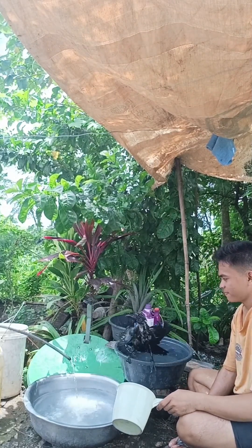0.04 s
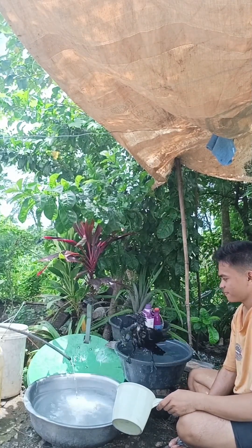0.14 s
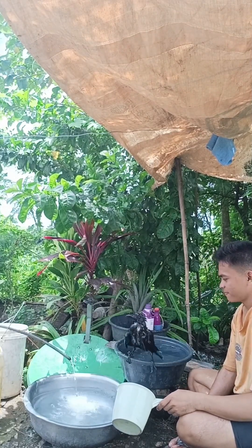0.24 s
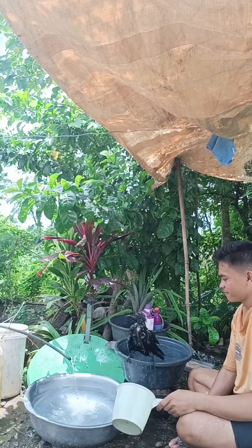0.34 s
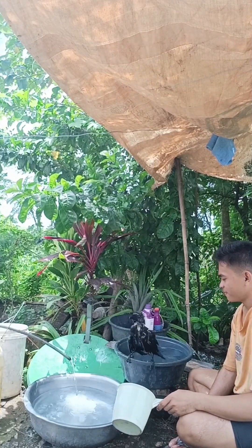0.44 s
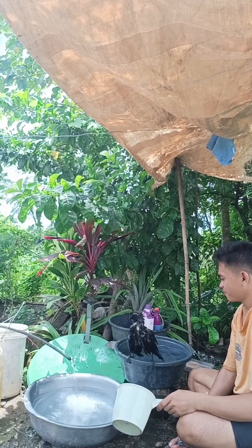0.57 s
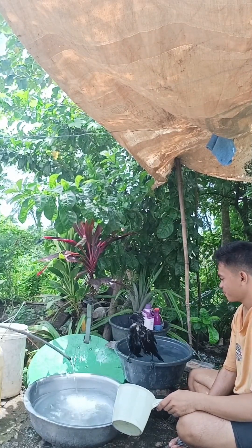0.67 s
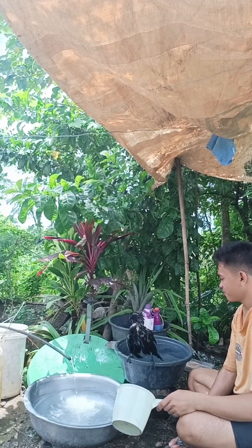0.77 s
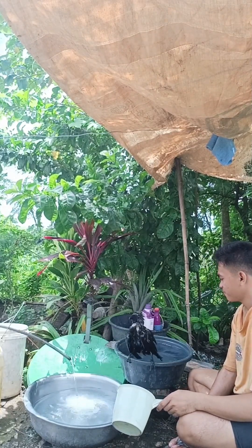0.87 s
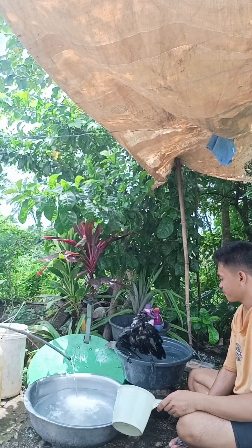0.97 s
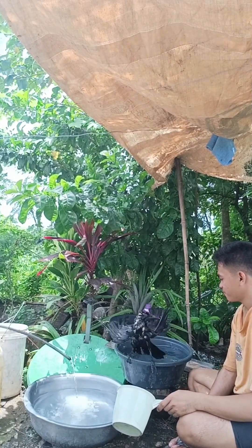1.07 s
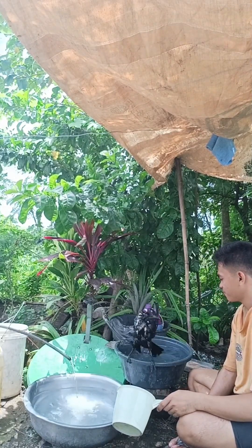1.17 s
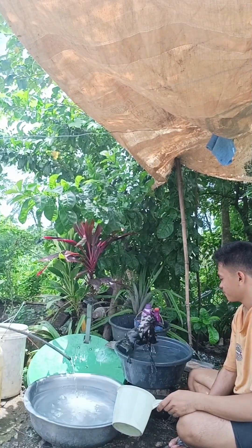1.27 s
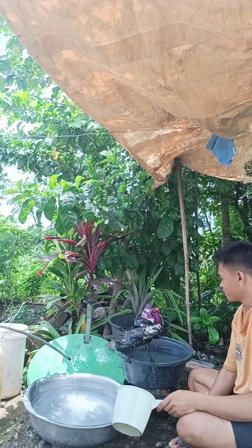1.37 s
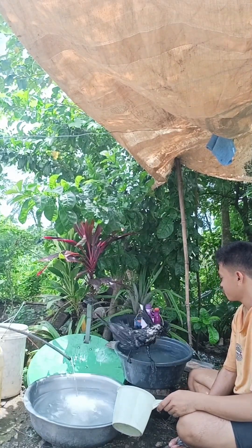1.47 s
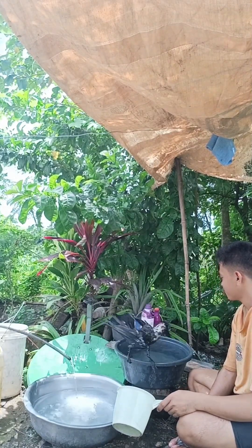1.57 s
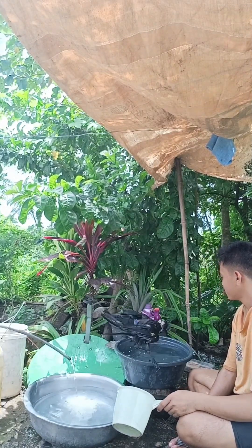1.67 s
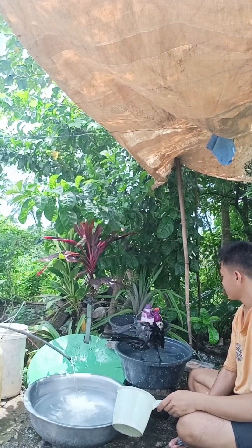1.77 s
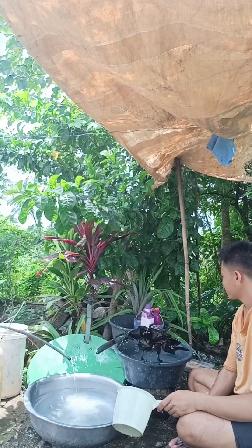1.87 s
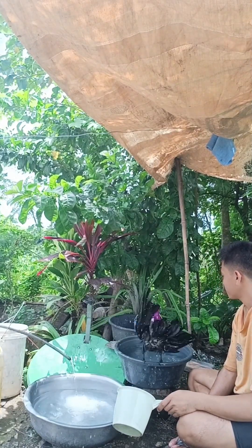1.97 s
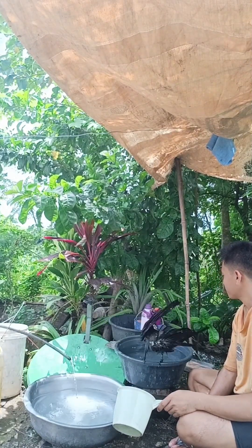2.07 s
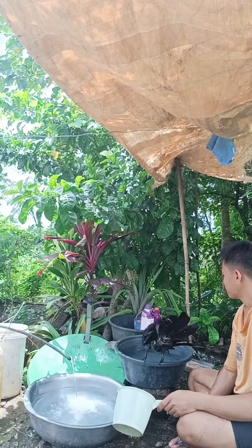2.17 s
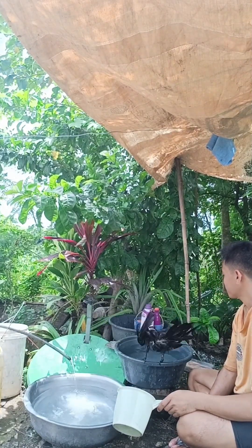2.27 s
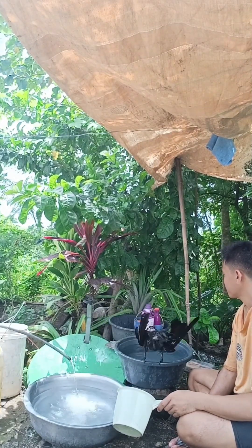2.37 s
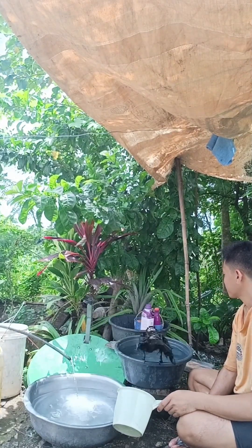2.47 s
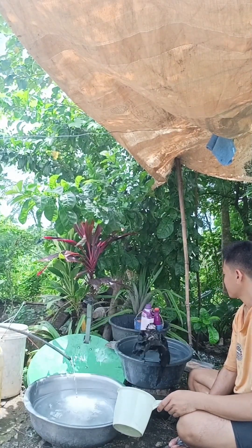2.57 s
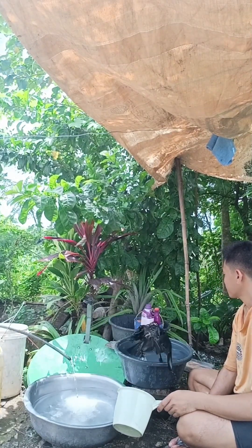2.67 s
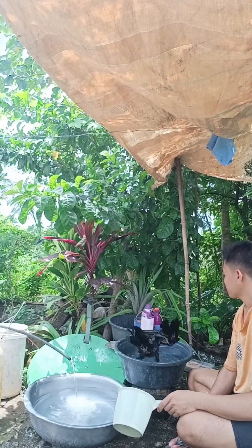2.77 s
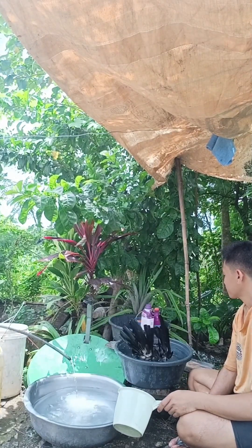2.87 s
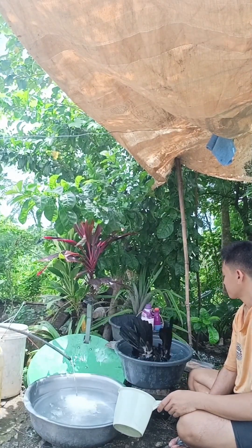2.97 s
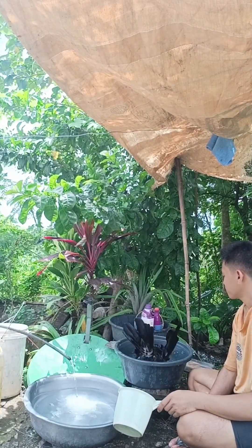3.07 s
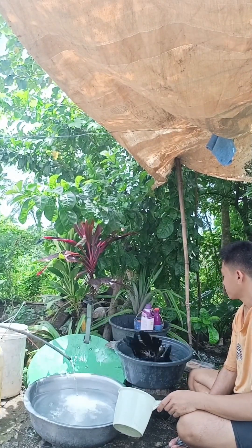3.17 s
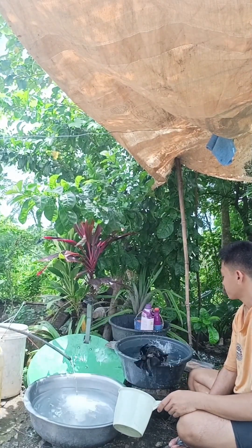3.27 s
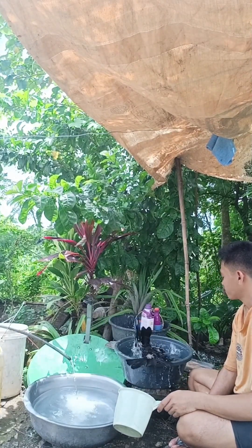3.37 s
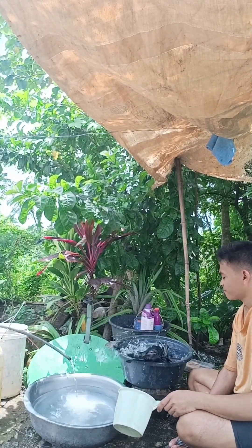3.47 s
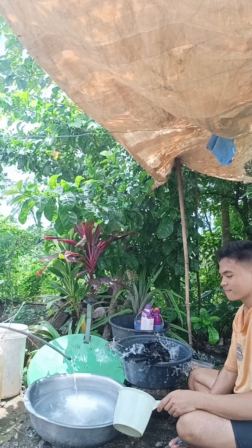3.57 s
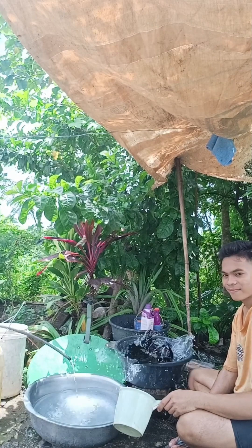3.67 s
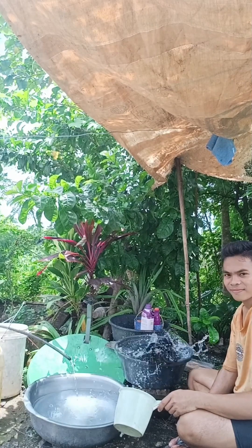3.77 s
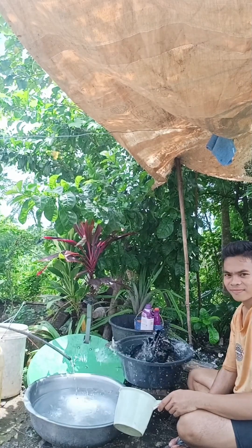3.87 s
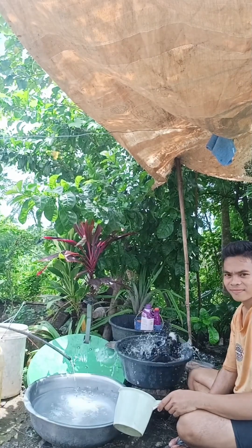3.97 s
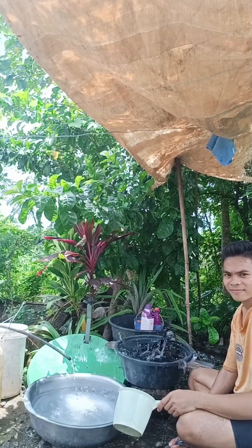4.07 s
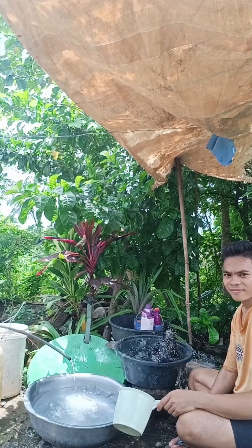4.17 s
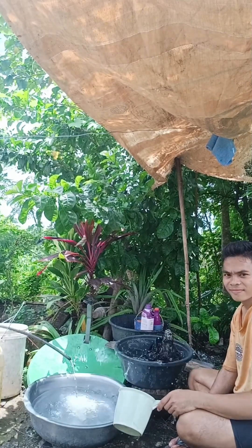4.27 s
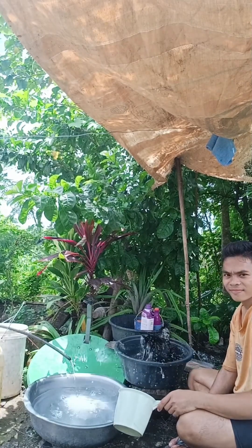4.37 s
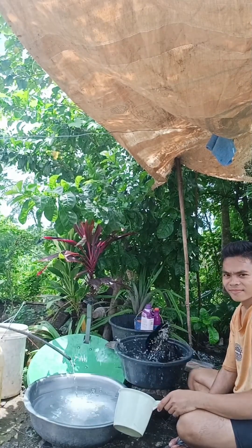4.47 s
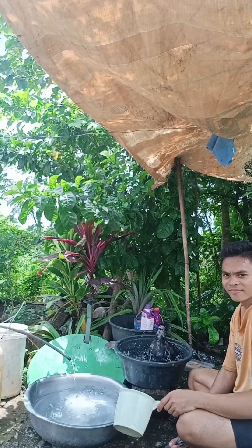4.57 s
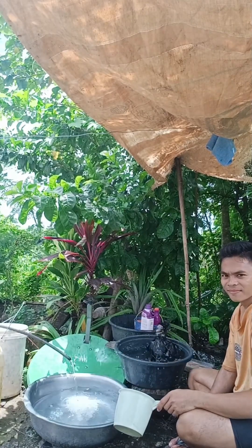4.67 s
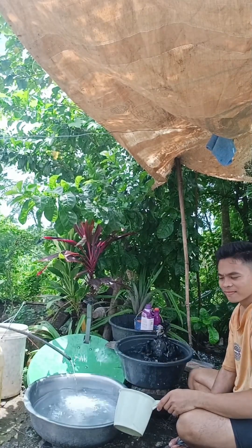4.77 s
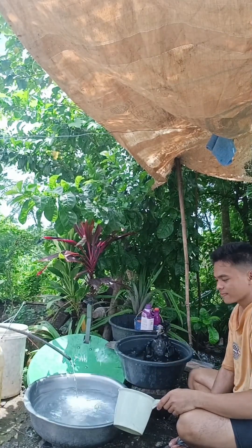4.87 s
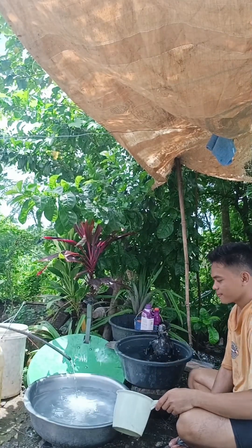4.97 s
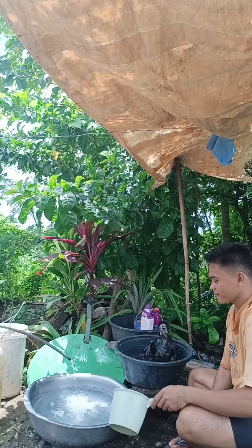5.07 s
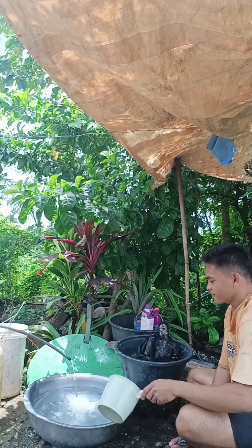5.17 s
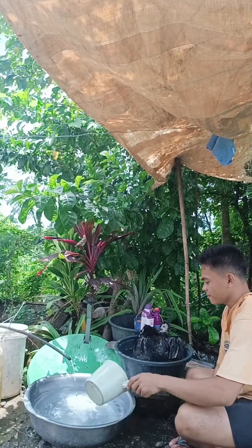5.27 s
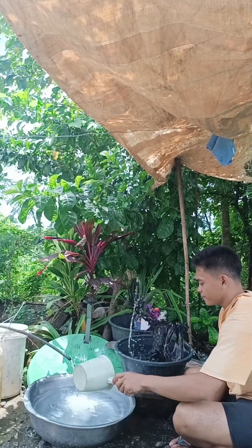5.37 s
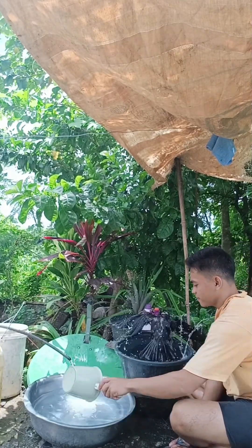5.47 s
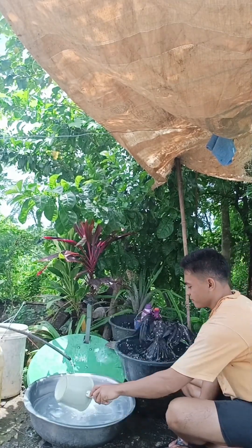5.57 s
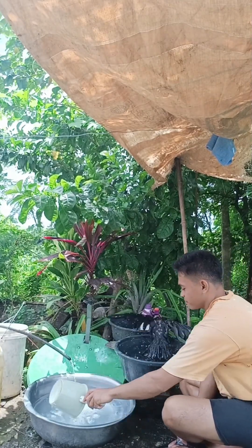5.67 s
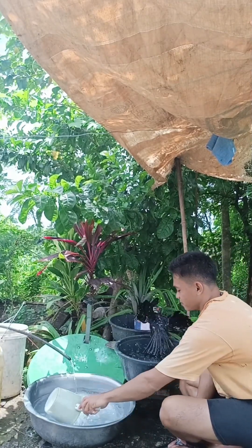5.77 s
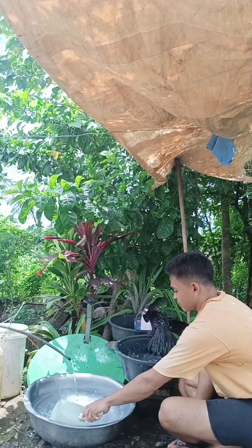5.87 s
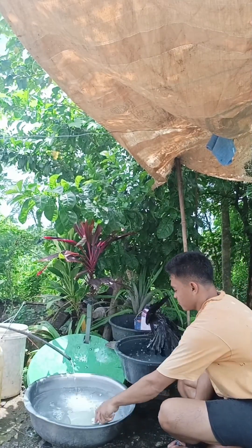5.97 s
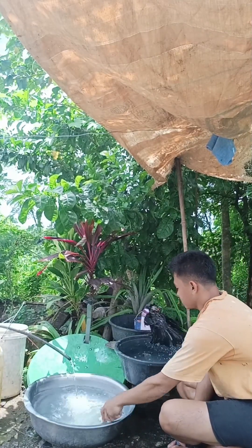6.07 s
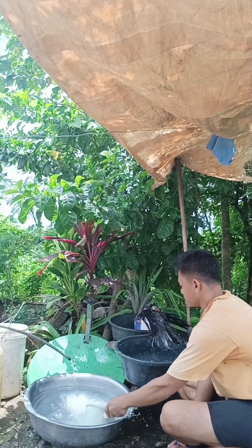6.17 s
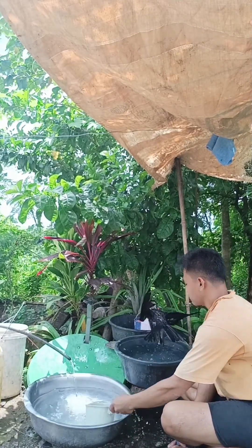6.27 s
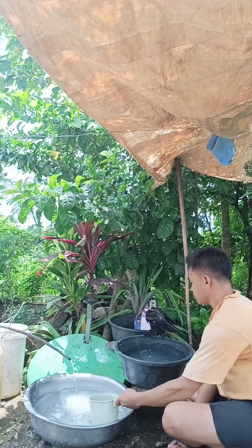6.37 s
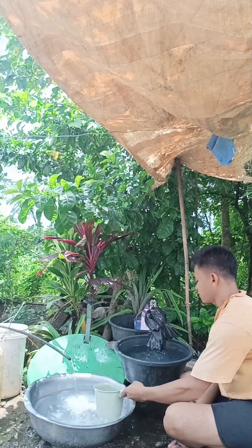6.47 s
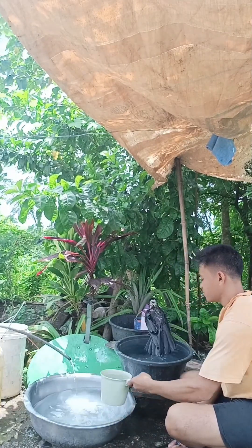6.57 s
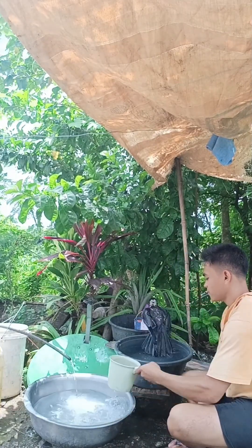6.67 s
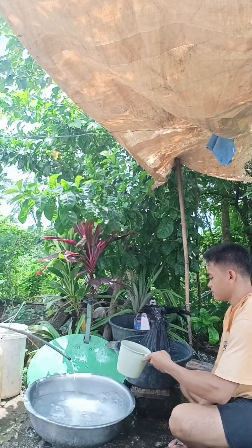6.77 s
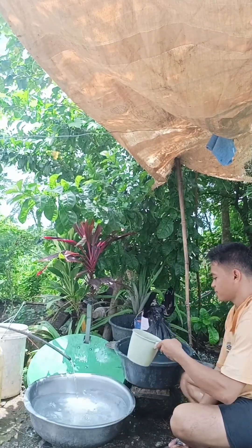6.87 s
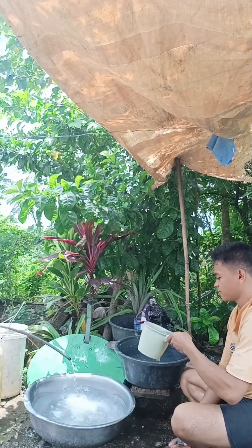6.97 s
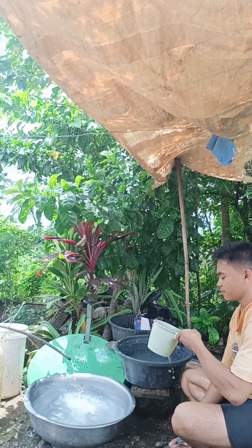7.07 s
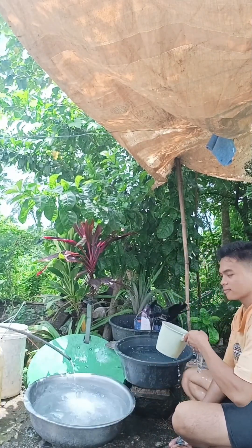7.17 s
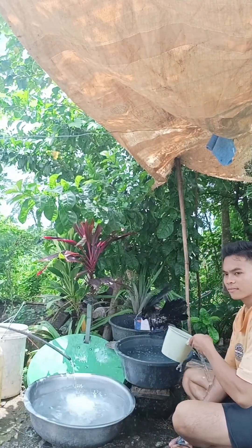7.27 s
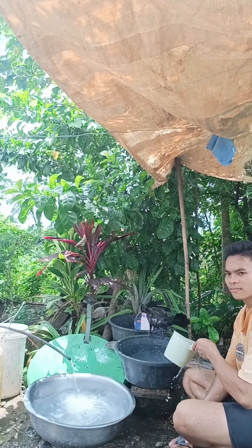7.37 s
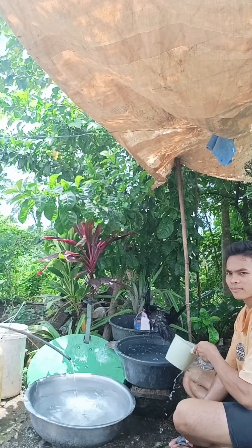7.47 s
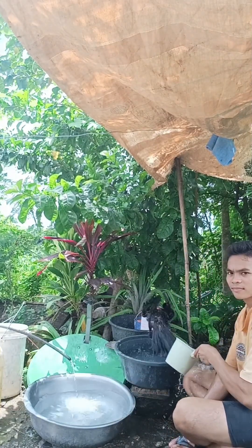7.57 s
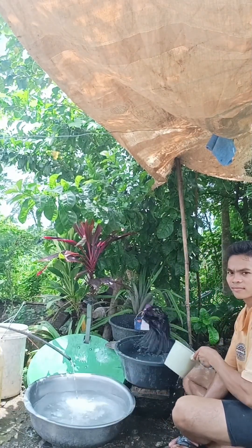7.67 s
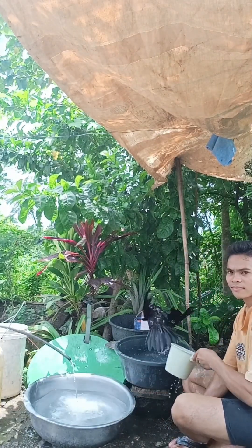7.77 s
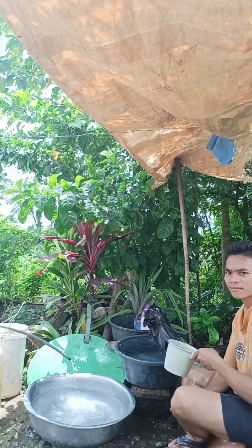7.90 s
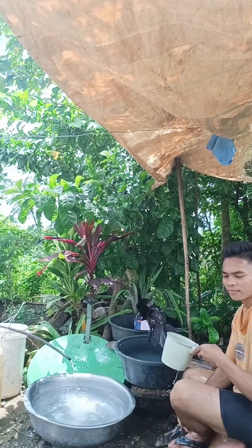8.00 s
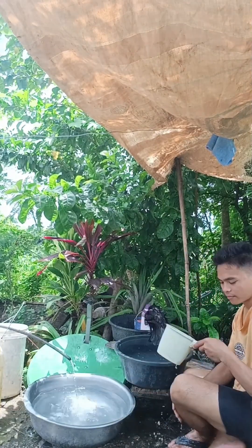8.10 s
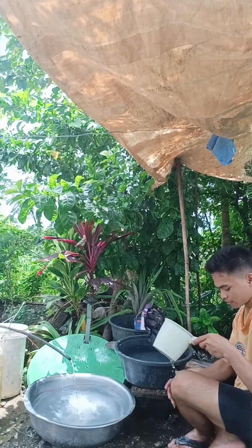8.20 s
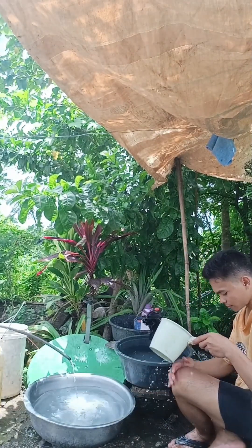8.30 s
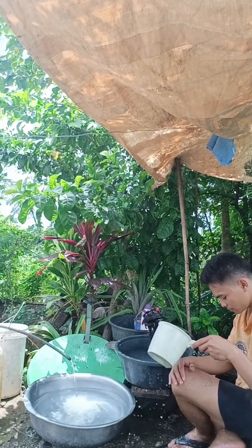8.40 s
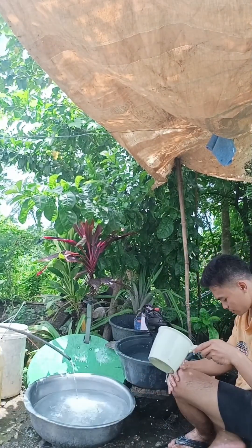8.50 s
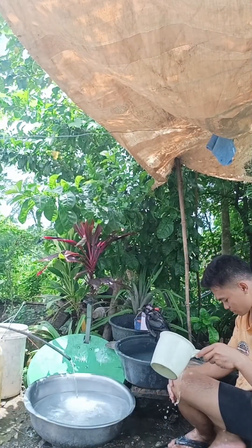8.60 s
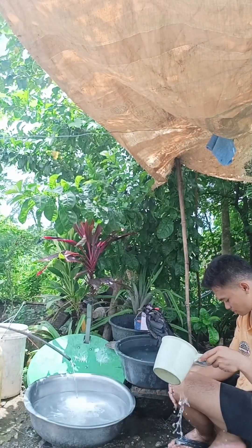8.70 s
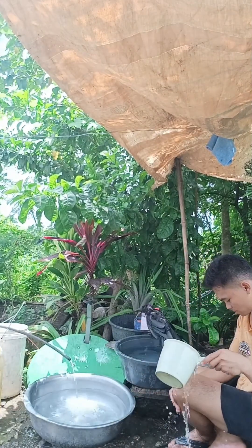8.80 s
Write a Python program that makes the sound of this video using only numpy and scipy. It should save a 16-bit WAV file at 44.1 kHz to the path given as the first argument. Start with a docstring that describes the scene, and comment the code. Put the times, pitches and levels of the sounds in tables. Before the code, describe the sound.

A bird splashes in a water tub in wet bursts over a thin trickle into a metal basin; a plastic dipper knocks, scoops and pours.

```python
"""In an open garden yard a bird bathes in a tub: wing beats, shakes, slaps and heavy drops churn the water
and throw spray in bursts. Wet sounds are air bubbles ringing in water, mixed with shaped noise. A thin
trickle runs all the while into a metal basin; stray drops tick on its rim. A plastic dipper knocks, exciting
the basin's modes, then scoops, slops and is tipped out on the ground. Filtered noise makes the rumble and
soft wash; low pulses make puffs of air. Two close microphone ports hear each spot direct and by echoes."""
import sys
import numpy as np
from scipy import signal
from scipy.fft import rfft, irfft, next_fast_len
from scipy.io import wavfile
from scipy.ndimage import map_coordinates

SR = 44100
rng = np.random.default_rng(int(sys.argv[2]) if len(sys.argv) > 2 else 0)


def pcm_store(signal):
    """Save signal as 16-bit PCM."""
    levels = np.round(np.clip(np.atleast_2d(signal), -1, 1) * 32767)
    wavfile.write(sys.argv[1], SR, levels.astype(np.int16).T)


N = 389830  # length in samples


def amp(db):
    """Logarithmic level: decibels to amplitude gain."""
    return 10 ** (np.asarray(db) / 20)


def unit(x):
    """Effective value: scale to rms 1."""
    return x / np.sqrt(np.mean(x ** 2) + 1e-20)


def along(points, hz):
    """Logarithmic pitch scale: interpolate (f/Hz, value) points along log frequency."""
    f, value = np.transpose(points)
    return np.interp(np.log(hz + 1), np.log(f + 1), value)


def wobble(rate):
    """Slow random modulation: a smooth curve through `rate` random knots a second."""
    knots = rng.standard_normal(int(N * rate / SR) + 4)
    return map_coordinates(knots, [np.arange(N) * rate / SR])


def filtered(x, response):
    """Linear filtering: multiply the spectrum of x by a response of frequency."""
    n = x.shape[-1]
    m = next_fast_len(n + 4096)
    return irfft(rfft(x, m) * response(np.fft.rfftfreq(m, 1 / SR)), m)[..., :n]


def coloured(x, spectrum):
    """Spectral shaping: pass x through (f/Hz, level/dB) points, then scale to rms 1."""
    return unit(filtered(x, lambda hz: amp(along(spectrum, hz))))


def add(track, s, sound):
    """Superposition: mix a sound into a track at time s."""
    part = track[..., max(round(s * SR), 0):][..., :sound.shape[-1]]
    part += sound[..., :part.shape[-1]]


def bubble(t, hz, life, rise):
    """Volume resonance: an air bubble rings, decays and climbs in pitch as it nears the surface."""
    u = t / life
    phase = 2 * np.pi * hz * t * (1 + rise * np.minimum(u, 6) / 2)
    return np.sin(phase) * np.exp(-u) * (1 - np.exp(-5 * u))


def bubbles(rate, hz, spread, cycles, rise, size_db, size=600):
    """Random superposition: a cloud of bubbles of random instant, pitch and strength, at rms 1."""
    count = int(rate * N / SR)
    when, pick, chance = rng.random((count, 3)).T
    pitch = hz * np.exp(spread * np.log(pick / (1 - pick)) / 2)
    pitch = np.clip(pitch, 300, 15000)[:, None]
    strength = amp(-size_db * np.log(np.maximum(chance, .02)))[:, None]
    rings = strength * bubble(np.arange(size) / SR, pitch, cycles / pitch, rise)
    index = (when * N).astype(int)[:, None] + np.arange(size)
    return unit(np.bincount(index.ravel(), rings.ravel(), N)[:N])


# likeness of diffuse sound at the two ports: (f/Hz, left-right correlation)
PORT_LIKENESS = [(25, 0.18), (60, 0.5), (130, 0.95), (300, 0.72), (600, 0.93), (1100, 0.48), (2200, 0.27),
                 (8000, 0.0059)]


def ports(pair):
    """Spatial coherence: mix two unrelated signals into two as alike as diffuse sound at close ports."""
    def turn(hz):
        return np.arccos(np.clip(along(PORT_LIKENESS, hz), -1, 1)) / 2
    mid = filtered(pair[0], lambda hz: np.cos(turn(hz)))
    side = filtered(pair[1], lambda hz: np.sin(turn(hz)))
    return np.array([mid + side, mid - side])


LAG = 7  # samples by which direct sound reaches the left port later


def paths(count, near_db, far_db):
    """Reflection: direct sound, quick echoes off tub and ground, and a short yard tail, from count spots."""
    t = np.arange(SR // 8) / SR
    tail = unit(amp(-60 * t / 0.18) * (1 - np.exp(-t / 0.0011)))
    near = unit(np.exp(-t / 0.005) * (t > .0005))
    envelope = np.hypot(amp(near_db) * near, amp(far_db) * tail)
    echoes = ports(rng.standard_normal((2, count, len(t))) * envelope)
    response = echoes / np.sqrt(len(t))
    response[0, :, LAG] += 1
    response[1, :, 0] += 1
    return response / np.sqrt(1 + amp(near_db) ** 2 + amp(far_db) ** 2)


def yard(x, pan_db=0, near_db=-5, far_db=-11):
    """Convolution: a sound made at one spot, as the two ports hear it."""
    heard = signal.fftconvolve(x[None], paths(1, near_db, far_db)[:, 0], axes=1)
    return heard[:, :len(x)] * amp([[pan_db / 2], [-pan_db / 2]])


def scattered(x, near_db, far_db, size=2048):
    """Distributed source: overlapping moments of the sound each come from a new spot."""
    count = len(x) // size
    padded = np.pad(x, (0, size))
    pieces = np.array([padded[k * size:(k + 2) * size] for k in range(count)])
    pieces = pieces * np.hanning(2 * size)
    heard = signal.fftconvolve(pieces[None], paths(count, near_db, far_db), axes=2)
    out = np.zeros((2, N))
    for k in range(count):
        add(out, k * size / SR, heard[:, k])
    return out


# level course of the outdoor rumble: (t/s, level/dB)
RUMBLE_LEVEL = [(0, -51.5), (1.3, -51.5), (4.3, -47.5), (8.84, -49)]
# spectrum of the outdoor rumble: (f/Hz, level/dB)
RUMBLE_SPECTRUM = [(12, -43), (20, 4), (74, 4), (85, 0.5), (98, -7), (140, -3.5), (178, -15.5), (209, -7.5),
                   (300, -37), (390, -32), (660, -120)]
# spectrum of running water and garden: (f/Hz, level/dB)
WASH_SPECTRUM = [(120, -4.5), (200, 0.5), (328, -7.5), (456, -8), (579, -4), (1180, -3), (1370, -7.5),
                 (2380, -13), (3250, -29.5), (6280, -27), (10100, -46), (14100, -39), (16000, -39)]


def background():
    """Diffuse field: partly coherent noise forms the outdoor rumble and the wash of garden and water."""
    level_db = np.interp(np.arange(N) / SR, *np.transpose(RUMBLE_LEVEL))
    rumble = coloured(ports(rng.standard_normal((2, N))), RUMBLE_SPECTRUM)
    rumble = rumble * amp(level_db + 0.26 * wobble(4.3))
    wash = coloured(ports(rng.standard_normal((2, N))), WASH_SPECTRUM)
    wash = wash * amp(-48.5 + 1.22 * wobble(20))
    return rumble * amp([[.9], [-.9]]) + wash  # rumble slightly stronger on the left


# spectrum of falling drops, also of the spray of slaps and splashes: (f/Hz, level/dB)
SPRAY_SPECTRUM = [(800, -14), (2000, -2), (3500, -3.5), (5000, -1), (6700, 0.5), (8000, -7), (10500, -13.5),
                  (15500, -21)]
TRICKLE_DB = -61.5  # common level of the two kinds of drop sound


def trickle():
    """Jet break-up: drops of a thin stream tick on the water, and some leave a tiny ringing bubble."""
    tinkle = bubbles(rate=100, hz=4400, spread=.38, cycles=10, rise=.02, size_db=3.7)
    ticks = bubbles(rate=120, hz=6500, spread=.7, cycles=1, rise=0, size_db=5)
    drops = amp(1.0) * tinkle + amp(3.5) * coloured(ticks, SPRAY_SPECTRUM)
    return scattered(drops * amp(TRICKLE_DB), near_db=13.0, far_db=7.0)


# stray drops on the basin's rim: (t/s, treble level/dB)
RIM_DROPS = [(0.08, -49), (0.3346, -52), (0.385, -45), (2.1954, -46), (2.2458, -42.5)]


def rim_ticks():
    """Impact on a hard body: a stray drop on the metal rim gives one short bright tick."""
    out, t = np.zeros((2, N)), np.arange(SR // 10) / SR
    for s, db in RIM_DROPS:
        tick = coloured(rng.standard_normal(len(t)), [(2000, -15), (6500, 5), (9000, 2), (15500, -10)])
        add(out, s, yard(amp(db) * tick * np.exp(-t / 0.0023)))
    return out


# slaps and heavy drops on the water, levels relative:
# (t/s, level/dB, air pocket f/Hz, spray level/dB re pocket, left-right level/dB, decay t/s)
SLAPS_AND_DROPS = [(0.207, -32, 4060, -24, -1, 0.0014), (1.515, -28, 880, -18, -1, 0.0075),
                   (1.549, -32, 1720, 8, 1, 0.003), (1.786, -26.5, 2460, -17, 2.5, .004),
                   (2.527, -22, 2300, -2, 2, 0.0044), (2.549, -34, 2850, -14, -2.5, 0.0034),
                   (2.914, -21.5, 1330, -36, 2, 0.0082), (3.3, -27, 2350, -15, 16, 0.0089),
                   (3.472, -26.5, 1980, 8, -2, .0026), (3.546, -7.5, 1040, -15.5, 0, 0.0029),
                   (3.568, -17, 1370, -25, .5, 0.0038), (3.639, -26.5, 1860, 2, 0, .0035),
                   (3.673, -20, 2150, -20, 7, 0.0028), (3.685, -9.5, 1160, -9.5, 0, 0.0025),
                   (3.929, -31.5, 1950, 10, -3, 0.0017), (4.294, -41.5, 1190, 11.5, -5, .0047),
                   (4.34, -31, 5340, 6, 0, 0.0028), (5.25, -25, 1750, -2, 4, 0.0026),
                   (5.299, -19, 840, -15, -1, 0.0036), (5.33, -16.5, 1200, -12.5, -1, .004),
                   (5.742, -19.5, 2040, -30, 4.5, 0.0075), (6.739, -34, 851, 6, 0, 0.013),
                   (6.889, -24.5, 1440, -4, 0, 0.0066), (6.959, -31.5, 2480, 3, -2, .003),
                   (7.083, -18.5, 1950, -28, 7.5, 0.0058), (7.393, -28.5, 1180, 7.5, -1, 0.0072),
                   (7.536, -30, 5370, 0, -1, 0.0051), (7.778, -22.5, 3730, -0.5, -6.5, 0.0039),
                   (8.681, -22.5, 2400, -8, 4.5, .0044), (8.749, -28.5, 4380, -18, 3, .0025)]
# spectrum of churning water, also beneath each slap or heavy drop: (f/Hz, level/dB)
CHURN_SPECTRUM = [(250, -10), (420, -17), (620, -1), (1150, -2.5), (2200, 3), (3200, 0), (6000, -46)]
TUB_HZ, TUB_DECAY_S = (545, 727), 0.0045  # band and decay of the tub's hollow
# a hard blow on the water, the tub's answer to it, dB of answer per dB of blow
HARD_BLOW_DB, TUB_DB, TUB_GROWS = -4, -25, 2.24


def slaps_and_heavy_drops():
    """Cavity excitation: a squeezed air pocket bursts hollow, with a hiss of spray; hard blows boom in the tub."""
    out, t = np.zeros((2, N)), np.arange(SR // 5) / SR
    attack = (1 - np.exp(-t / .0024)) ** 2
    hollow = signal.butter(3, TUB_HZ, "band", fs=SR, output="sos")
    for s, db, hz, spray_db, pan_db, decay in SLAPS_AND_DROPS:
        u = t / max(decay, .002)
        shape = attack * (np.exp(-u) + .02 * np.exp(-u / 5))
        band = [hz / 1.48, min(hz * 1.423, SR / 2.2)]
        pocket = signal.butter(3, band, "band", fs=SR, output="sos")
        body, hiss, push = rng.standard_normal((3, len(t)))
        burst = unit(signal.sosfilt(pocket, body * shape))
        burst = burst + amp(-11.5) * coloured(body * shape, CHURN_SPECTRUM)
        spray = amp(spray_db - 5.5) * coloured(hiss * shape, SPRAY_SPECTRUM)
        boom = unit(signal.sosfilt(hollow, push * np.exp(-t / TUB_DECAY_S)))
        boom = amp(TUB_DB + TUB_GROWS * (db - HARD_BLOW_DB)) * boom
        impact = amp(db - 20) * (burst + spray) + boom
        add(out, s - .001, yard(impact, pan_db, near_db=-3, far_db=-10))
    return out


# single large bubbles and drips: (t/s, relative level/dB, f/Hz, left-right level/dB)
DRIPS = [(0.499, -34.5, 4500, -1), (1.054, -43, 2070, 2), (1.742, -30.5, 3610, 3), (1.804, -35, 2740, 10),
         (2.413, -27, 3340, 2), (2.626, -39, 2610, 15), (2.843, -28.5, 4690, -3), (3.129, -36, 1980, 11),
         (3.348, -22.5, 1096, 1), (3.392, -17, 766, 2), (3.414, -21.5, 1450, 7), (4.054, -32, 5700, -5),
         (4.068, -34.5, 4680, -14), (4.146, -38.5, 6470, -11), (4.43, -27.5, 1980, 2),
         (4.891, -34, 3380, 0), (4.987, -37, 3960, 0), (5.029, -37.5, 2520, 18), (5.148, -39, 3880, 5),
         (5.722, -21.5, 1700, -1), (5.902, -27.5, 651, -2), (6.062, -37, 4960, -1), (6.443, -32, 4400, -4),
         (6.479, -37, 2620, 6), (6.586, -32.5, 3400, 1), (6.647, -31, 1246, 11.5), (7.034, -27.5, 2090, 3),
         (7.269, -25, 3870, 1.5), (7.296, -40, 2570, 19), (7.746, -16.5, 2154, 6), (7.837, -30.5, 2050, -1),
         (8.184, -33.5, 2320, -7), (8.334, -30, 3750, -10)]
# slow gulps of a closing air pocket: (t/s, level/dB, f/Hz, life t/s, fractional pitch rise per life)
AIR_GULPS = [(2.531, -27.5, 359, 0.012, 0.028), (2.86, -31, 660, 0.018, 0.66),
             (5.588, -29, 450, 0.016, 0.026), (5.607, -30, 291, 0.024, 0.032),
             (5.655, -29.5, 416, .02, .03), (6.255, -28.5, 513, 0.014, 0.044)]


def plops():
    """Bubble entrainment: drips tick on the surface and trap one bubble each; larger pockets gulp."""
    out, t = np.zeros((2, N)), np.arange(SR // 5) / SR
    for s, db, hz, pan_db in DRIPS:
        life = np.clip(4.8 / hz, .002, .007)  # 4.8 cycles, within limits in s
        tick = 0.027 * rng.standard_normal(len(t)) * np.exp(-t / 0.00067)
        drip = amp(db + 8) * (bubble(t, hz, life, rise=0.049) + tick)
        add(out, s, yard(drip, pan_db, near_db=-4, far_db=-10))
    for s, db, hz, life, rise in AIR_GULPS:
        gulp = amp(db) * bubble(t, hz, life, rise)
        add(out, s, yard(gulp, near_db=-10, far_db=-14))
    return out


# soft pushes of moving air: (t/s, level/dB, f/Hz)
AIR_PUFFS = [(0.562, -44, 71), (2.991, -33.5, 48), (5.536, -39.5, 42.6)]


def puffs():
    """Pressure pulse: moving air gives the microphone one soft low push, the same at both ports."""
    out, t = np.zeros(N), np.arange(-SR // 10, SR // 10) / SR
    for s, db, hz in AIR_PUFFS:
        add(out, s + t[0], amp(db) * np.cos(2 * np.pi * hz * t) * np.exp(-(t * hz) ** 2))
    return out


SURGE_RISE_S = 0.017  # rise of stirred water, also of the pour
CHURN_FALL_S, SPRAY_FALL_S = 0.021, 0.013
SETTLE_DB, SETTLE_S = -13.5, 0.22  # the last ripples and falling drops after each surge


def surges(rows):
    """Energy addition: churn and spray gains of surges that each collapse and then settle slowly."""
    power = np.zeros((2, N))
    t = np.arange(-(SR // 10), SR) / SR
    rise = np.exp(np.minimum(t, 0) / SURGE_RISE_S)
    for s, length, churn_db, spray_db in rows:
        after = np.maximum(t - length, 0)
        collapse = np.exp(-after / [[CHURN_FALL_S], [SPRAY_FALL_S]])
        fall = np.maximum(collapse, amp(SETTLE_DB) * np.exp(-after / SETTLE_S))
        gains = amp([[churn_db], [spray_db]]) * rise * fall
        add(power, s + t[0], gains ** 2)
    return np.sqrt(power)


# surges of splashing: wing beats, shakes and slopping water:
# (t/s, length t/s, churn level/dB, spray level/dB)
SPLASH_SURGES = [(1.552, 0.011, -45, -46), (2.535, 0.024, -33.5, -47), (2.93, 0.016, -33.5, -42),
                 (3.03, 0.0071, -36, -49.5), (3.16, 0.021, -49, -39.5), (3.215, 0.021, -39.5, -34),
                 (3.295, 0.034, -32.5, -35.5), (3.375, 0.091, -31, -44), (3.47, 0.059, -29, -37),
                 (3.57, 0.03, -31, -42), (3.638, 0.013, -38, -40), (3.695, 0.027, -29, -39.5),
                 (3.76, 0.042, -36, -40.5), (3.84, 0.051, -33.5, -39), (3.895, 0.037, -31.5, -39),
                 (4.035, .04, -70, -43.5), (4.32, 0.032, -49, -44.5), (5.19, 0.033, -42, -56),
                 (5.255, 0.019, -35.5, -46), (5.315, 0.022, -29, -47), (7.03, 0.07, -40.5, -38),
                 (7.348, 0.012, -36, -36.5), (7.402, 0.0081, -33.5, -37.5)]
# the full dipper slops over: (t/s, length t/s, churn level/dB, spray level/dB)
SLOP_SURGES = [(7.59, .1, -51, -42), (7.715, 0.086, -56, -38), (7.814, 0.15, -50, -48),
               (8.67, 0.069, -45.5, -51.5), (8.808, .03, -38.5, -55)]
# the dipper ploughs through the basin and fills: (t/s, length t/s, churn level/dB, spray level/dB)
SCOOP_SURGES = [(5.598, 0.029, -38.5, -53), (5.75, 0.012, -45, -42), (5.845, 0.057, -31.5, -40.5),
                (5.925, 0.047, -31, -46.5), (6.01, 0.012, -38, -68), (6.163, 0.03, -38, -44),
                (6.234, 0.021, -37, -41.5), (6.313, 0.013, -44.5, -44)]
# spectrum of water running over the dipper's lip: (f/Hz, level/dB)
INRUSH_SPECTRUM = [(250, -32), (450, -10), (750, -10), (1200, -6.5), (1800, 1.5), (3000, 4.5), (4300, -5),
                   (6500, -39)]
SHALLOW_HZ = 1180  # only deep stirring strengthens bubbles below this pitch
DEEP_DB, DEEPENS = -25, 0.12  # churn that is fully deep, extra dB of big bubbles per dB of churn


def splashing():
    """Bubble noise: harder stirring favours bigger bubbles; thrown drops fall back as crackling spray."""
    churn_gain, spray_gain = surges(SPLASH_SURGES + SLOP_SURGES)
    inrush_gain, lip_gain = surges(SCOOP_SURGES)
    clumps = amp(.7 * wobble(60))
    gurgle = bubbles(rate=1200, hz=1400, spread=.6, cycles=7, rise=.06, size_db=2.6)
    froth = gurgle + 0.65 * rng.standard_normal(N)
    churn = coloured(froth, CHURN_SPECTRUM)
    small = filtered(churn, lambda hz: hz ** 4 / (hz ** 4 + SHALLOW_HZ ** 4))
    big = churn - small
    churn = small + big * (churn_gain / amp(DEEP_DB)) ** DEEPENS
    inrush = coloured(froth, INRUSH_SPECTRUM) * inrush_gain
    stirred = amp(-3) * churn * churn_gain + amp(1.5) * inrush
    drops = bubbles(rate=3000, hz=6000, spread=.7, cycles=1.3, rise=0, size_db=4, size=100)
    fizz = bubbles(rate=450, hz=4600, spread=.4, cycles=11, rise=.02, size_db=3.2)
    spray = coloured(drops + .4 * fizz + .9 * rng.standard_normal(N), SPRAY_SPECTRUM)
    thrown = spray * np.hypot(spray_gain, lip_gain) * amp(3.25)
    low = scattered(stirred * clumps, near_db=-3, far_db=-8.5)
    return low + scattered(thrown * clumps, near_db=11.5, far_db=-20)


# the dipper strikes the basin: (t/s, blow level/dB, crack level/dB re blow), both relative
DIPPER_KNOCKS = [(5.585, -19.5, 0.5), (5.622, -18, -27), (5.712, -26, -32)]
# modes of dipper and water-filled basin: (f/Hz, bandwidth f/Hz, level/dB)
BASIN_MODES = [(155, 19, 0.5), (227, 44, -9), (299, 16, 0), (330, 7.5, 7.5), (457, 29, -0.5),
               (492, 54, -1.5), (622, 89, 2), (774, 94, -8), (847, 17, 4), (1500, 43, -5.5),
               (1670, 110, -4.5), (2390, 140, -13), (2860, 310, -5.5), (3450, 980, -12.5)]
# spectrum of the dipper's crack: (f/Hz, level/dB)
CRACK_SPECTRUM = [(150, -6), (330, -9), (600, -3), (1050, -7), (1500, 4), (3600, 4.5), (5000, -13),
                  (14000, -28)]
FILL_S, BOOM_DB = 0.48, 6.7  # the basin booms less as the dipper fills


def basin_response(f):
    """Modal superposition: resonances of alternating sign, each with its own width and level."""
    total = 0
    for k, (hz, width, db) in enumerate(BASIN_MODES):
        total = total + (-1) ** k * amp(db) * 1j * f * width / (hz * hz - f * f + 1j * f * width)
    return total


def dipper():
    """Forced modes: plastic cracks and judders on the basin; inrushing water keeps both booming, ever less."""
    blows, t = np.zeros(N), np.arange(SR // 2) / SR
    for s, db, crack_db in DIPPER_KNOCKS:
        judder = np.exp(-t / 0.0037) + 0.56 * np.exp(-t / 0.039)
        add(blows, s, amp(db) * rng.standard_normal(len(t)) * judder)
    since_knock = np.maximum(np.arange(N) / SR - DIPPER_KNOCKS[0][0], 0)
    emptiness = np.exp(-since_knock / FILL_S)
    slosh_gain = surges(SCOOP_SURGES)[0] * np.sqrt(emptiness)
    slosh = slosh_gain * rng.standard_normal(N) * amp(2.8 * wobble(40))
    out = filtered(amp(12.5) * blows + amp(BOOM_DB) * slosh, basin_response)
    for s, db, crack_db in DIPPER_KNOCKS:
        crack = coloured(rng.standard_normal(len(t)), CRACK_SPECTRUM)
        crack = crack * (np.exp(-t / 0.0081) + 0.28 * np.exp(-t / 0.037))
        add(out, s, amp(db + crack_db - 2.0) * crack)
    return yard(out, near_db=-4)


# the dipper is tipped out on the ground
POUR_AT_S, POUR_HOLD_S, POUR_FALL_S, POUR_DB = 8.505, 0.15, 0.11, -45.5


def spatter():
    """Impact without entrainment: drops on hard ground give bright dry ticks, fading as the dipper empties."""
    ticks = bubbles(rate=900, hz=9000, spread=.5, cycles=.8, rise=0, size_db=4, size=40)
    bright = coloured(ticks, [(1500, 2), (5000, -4.5), (7000, -3), (10000, -8.5), (15500, -8)])
    t = np.arange(N) / SR - POUR_AT_S
    onset = np.clip(t / SURGE_RISE_S, -20, 0)
    flow = np.exp(onset - np.maximum(t - POUR_HOLD_S, 0) / POUR_FALL_S)
    return scattered(bright * amp(POUR_DB) * flow, near_db=2, far_db=-6)


def scene():
    """Superposition: the sum of all sources."""
    steady = background() + trickle()
    impacts = rim_ticks() + slaps_and_heavy_drops() + plops()
    return steady + impacts + puffs() + splashing() + dipper() + spatter()


def record(dry):
    """Band limitation: a sharp low-pass keeps nothing above 15850 Hz."""
    return filtered(dry, lambda hz: hz < 15850)


dry = scene()
out = record(dry)
pcm_store(out)
```